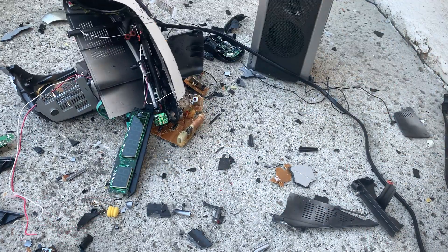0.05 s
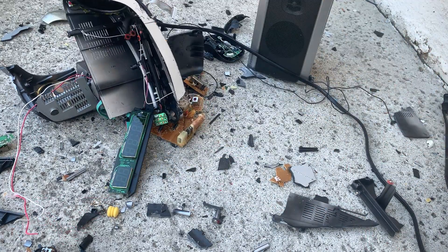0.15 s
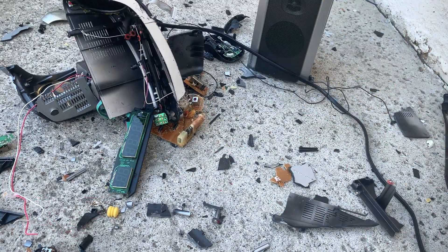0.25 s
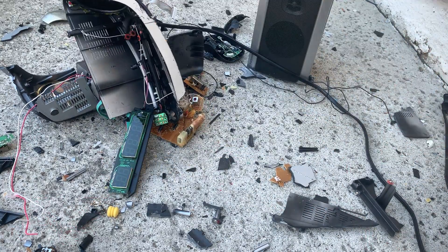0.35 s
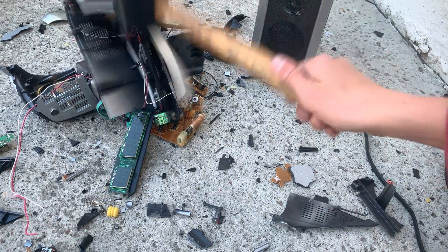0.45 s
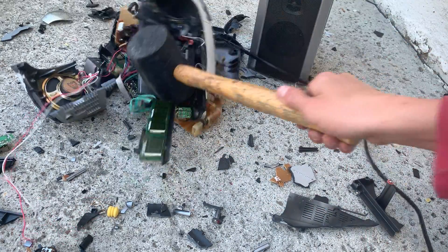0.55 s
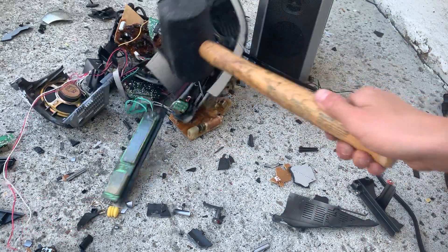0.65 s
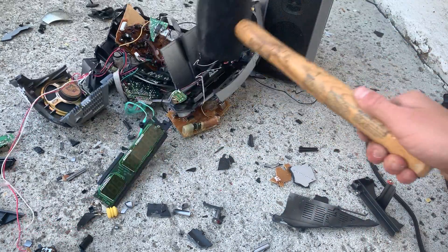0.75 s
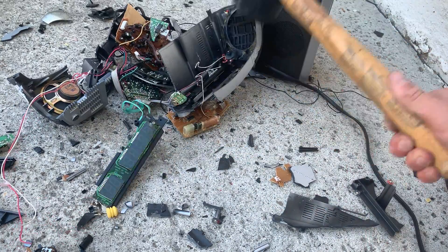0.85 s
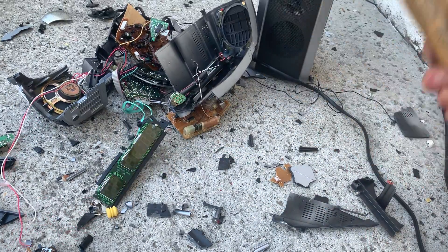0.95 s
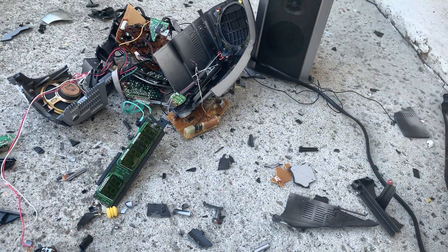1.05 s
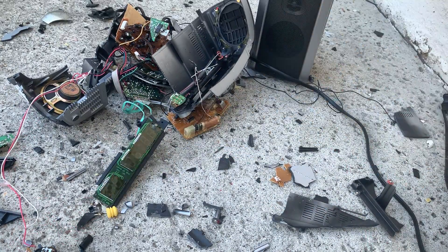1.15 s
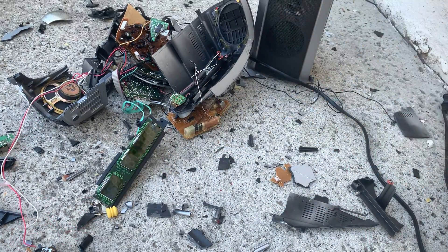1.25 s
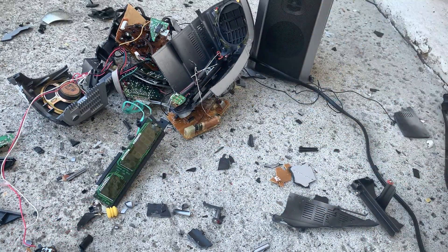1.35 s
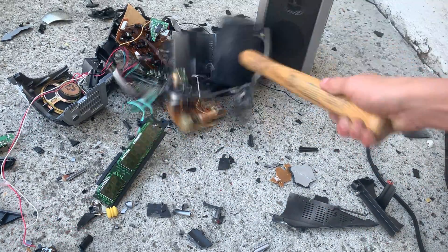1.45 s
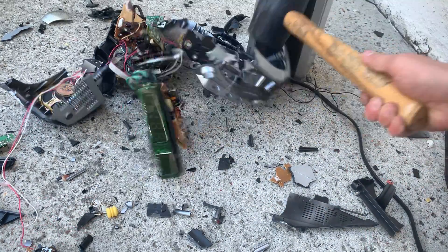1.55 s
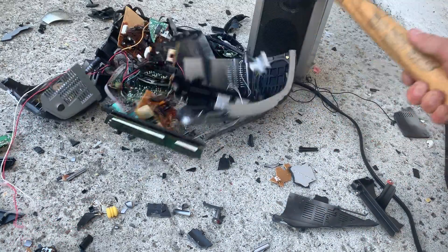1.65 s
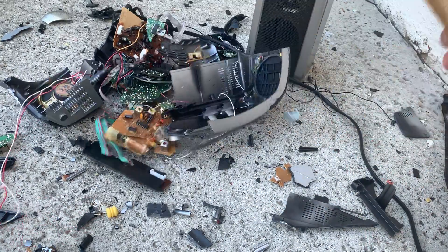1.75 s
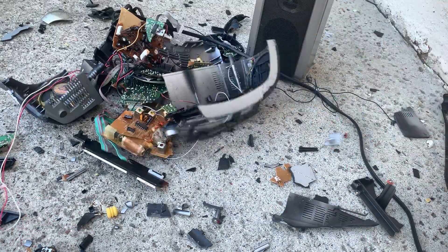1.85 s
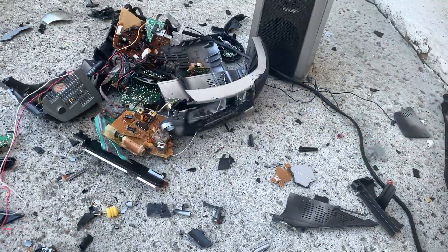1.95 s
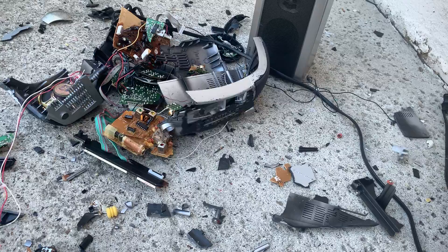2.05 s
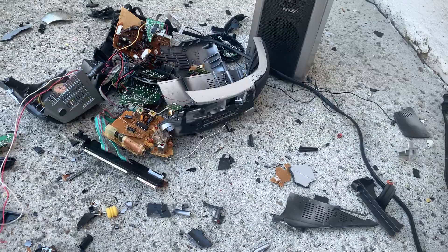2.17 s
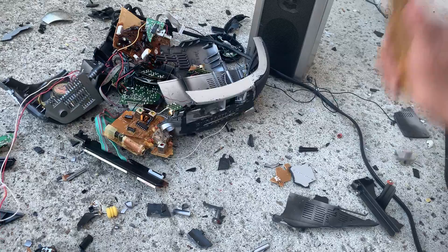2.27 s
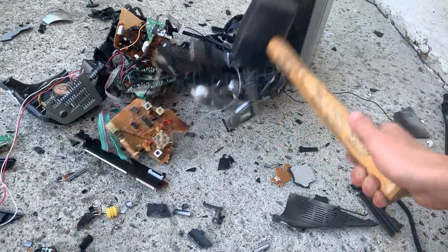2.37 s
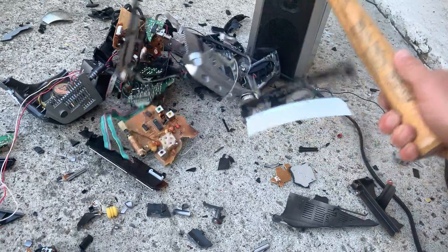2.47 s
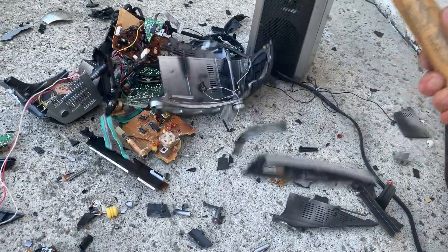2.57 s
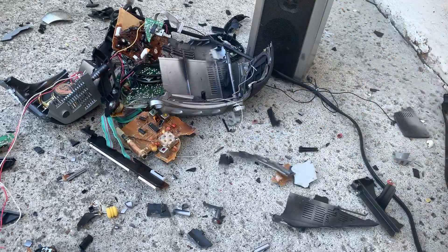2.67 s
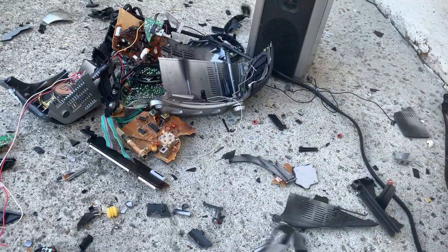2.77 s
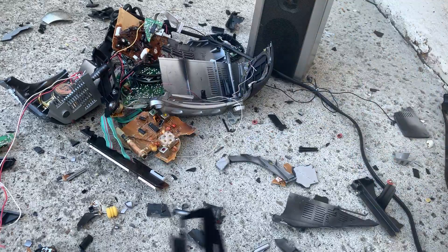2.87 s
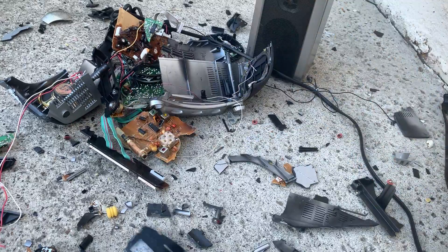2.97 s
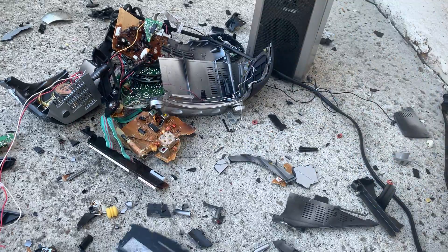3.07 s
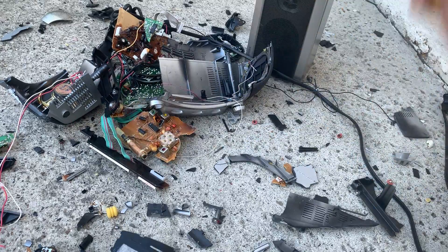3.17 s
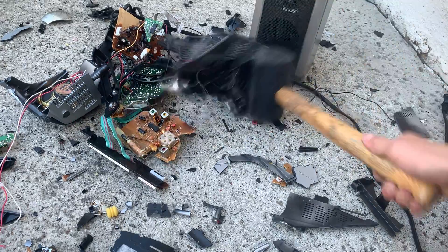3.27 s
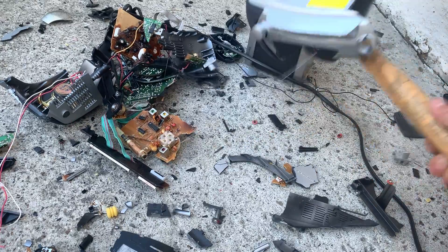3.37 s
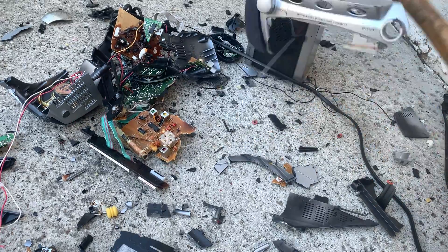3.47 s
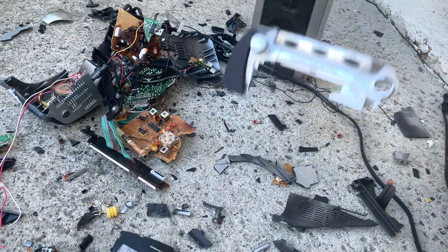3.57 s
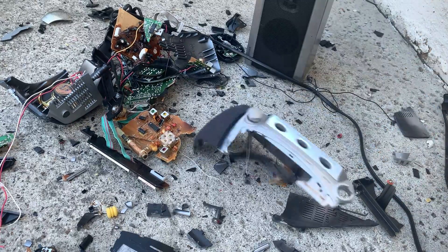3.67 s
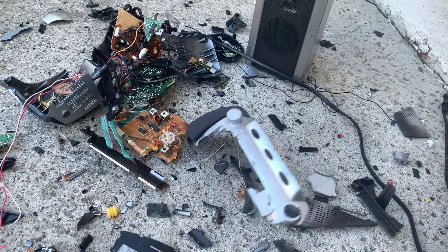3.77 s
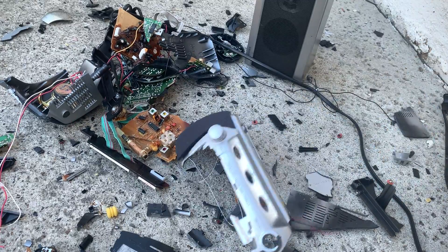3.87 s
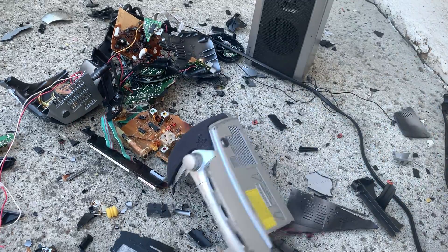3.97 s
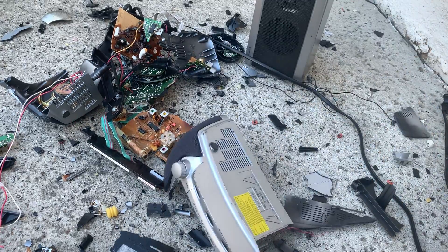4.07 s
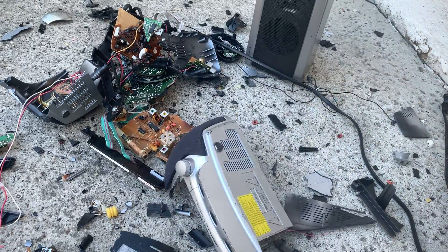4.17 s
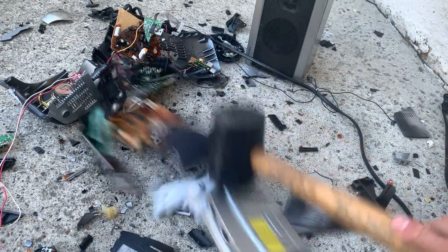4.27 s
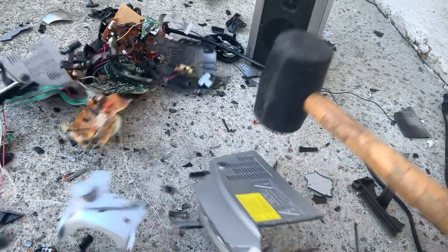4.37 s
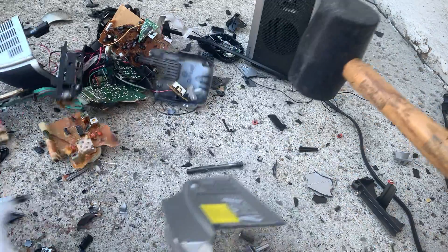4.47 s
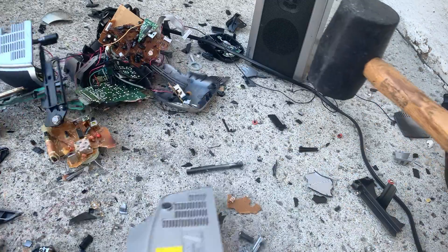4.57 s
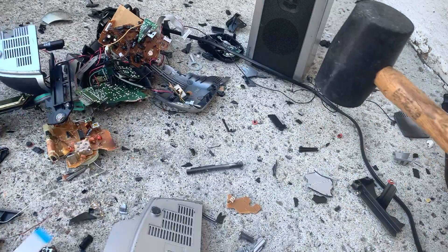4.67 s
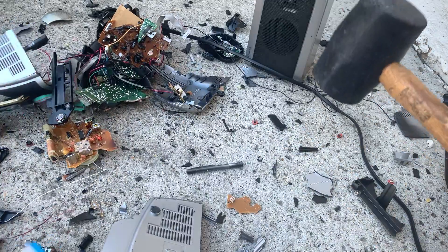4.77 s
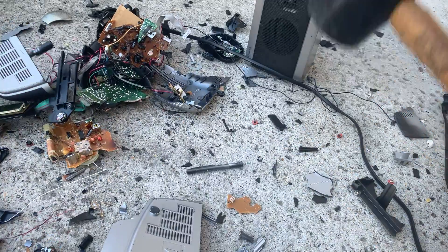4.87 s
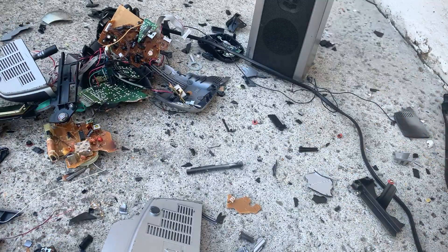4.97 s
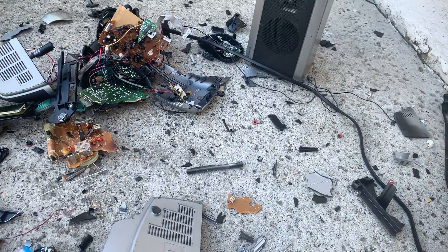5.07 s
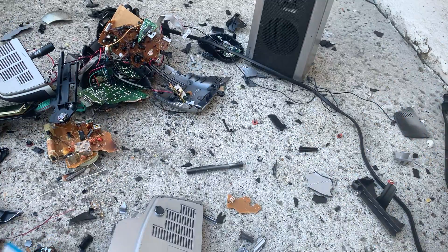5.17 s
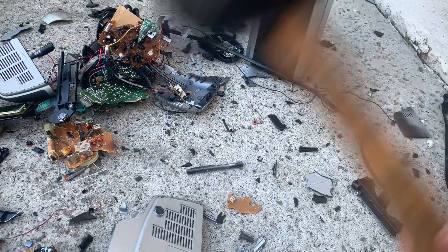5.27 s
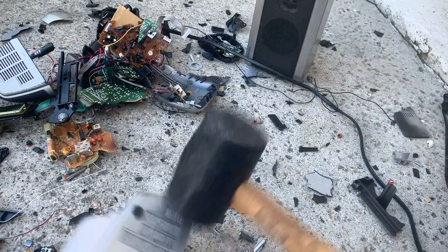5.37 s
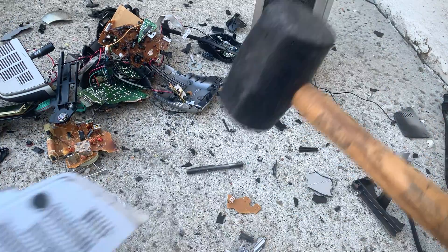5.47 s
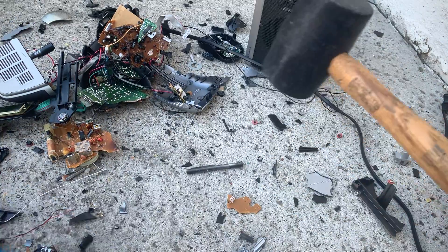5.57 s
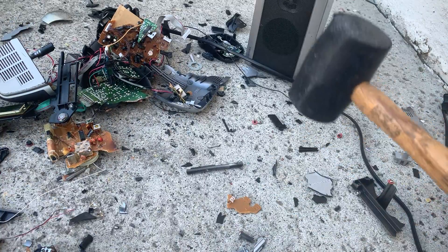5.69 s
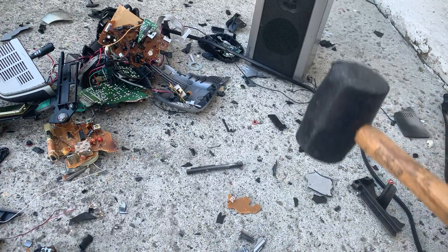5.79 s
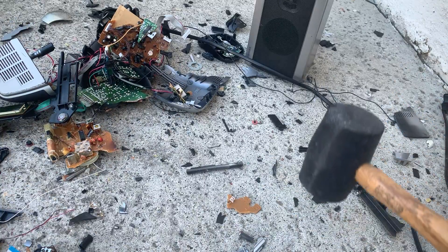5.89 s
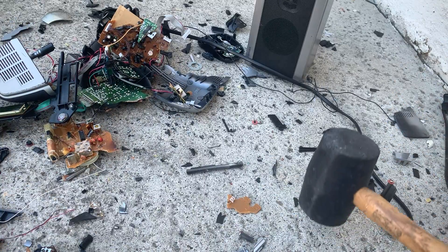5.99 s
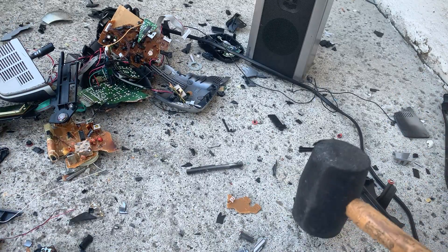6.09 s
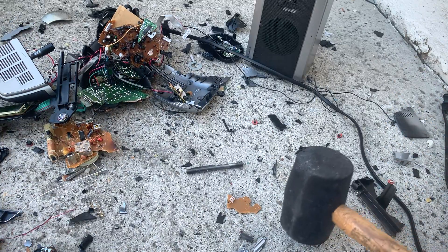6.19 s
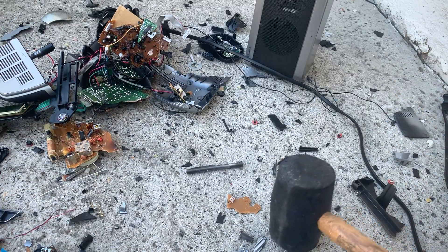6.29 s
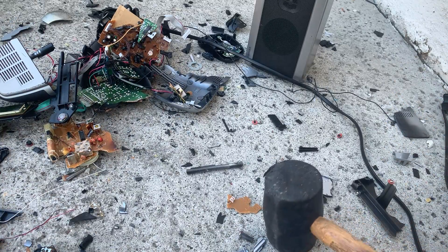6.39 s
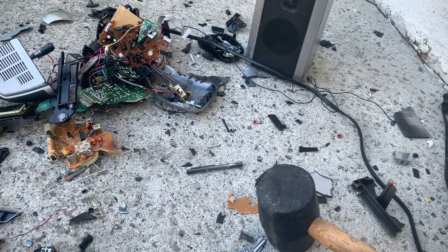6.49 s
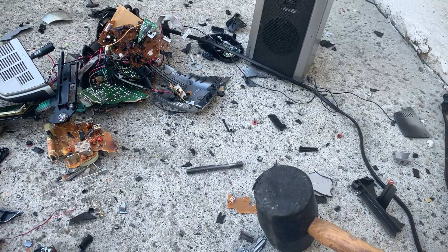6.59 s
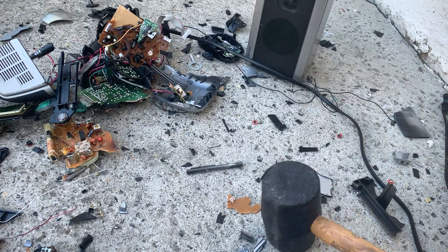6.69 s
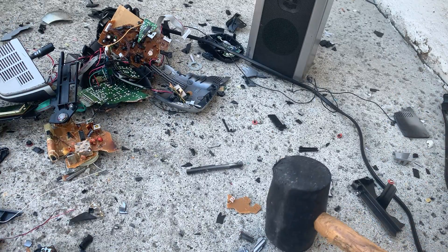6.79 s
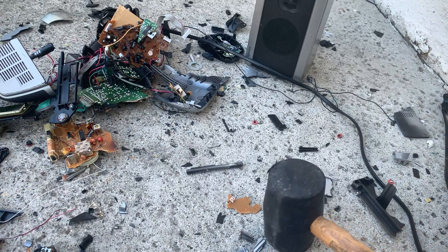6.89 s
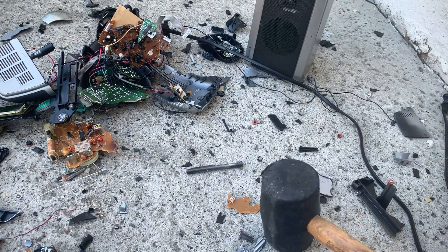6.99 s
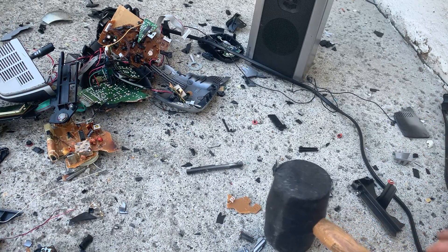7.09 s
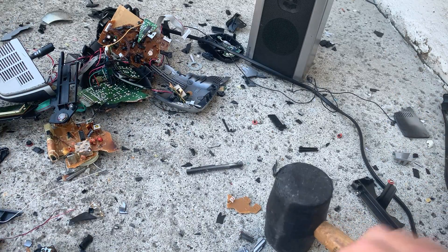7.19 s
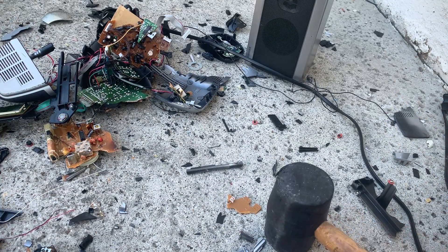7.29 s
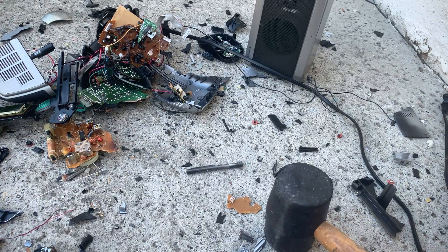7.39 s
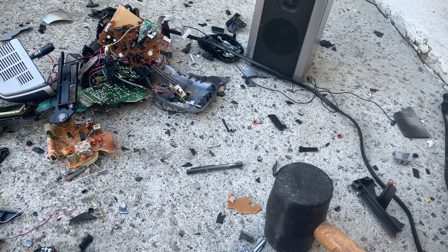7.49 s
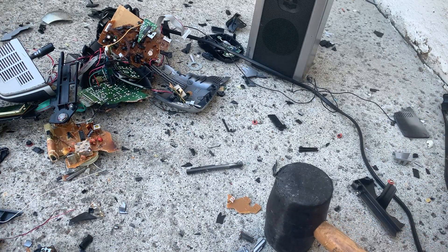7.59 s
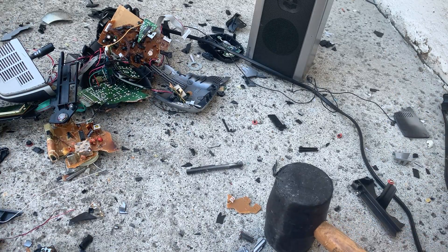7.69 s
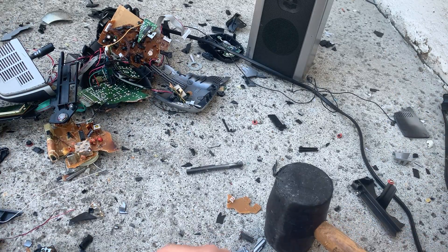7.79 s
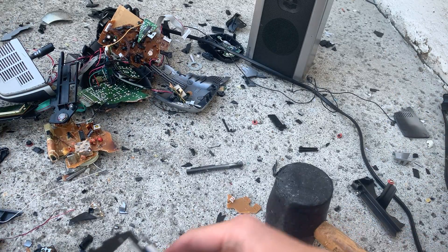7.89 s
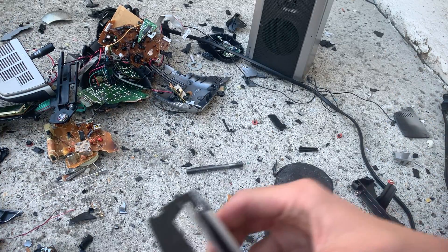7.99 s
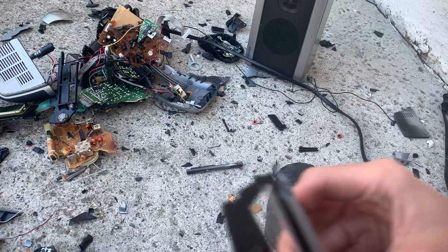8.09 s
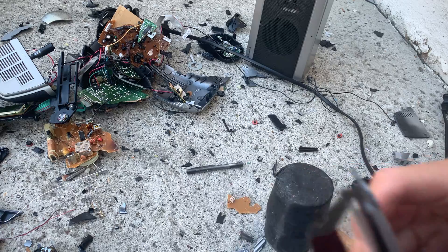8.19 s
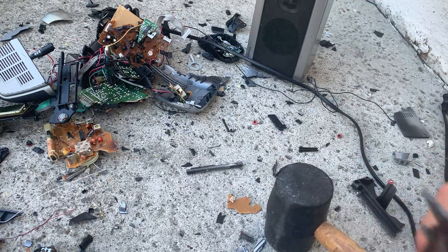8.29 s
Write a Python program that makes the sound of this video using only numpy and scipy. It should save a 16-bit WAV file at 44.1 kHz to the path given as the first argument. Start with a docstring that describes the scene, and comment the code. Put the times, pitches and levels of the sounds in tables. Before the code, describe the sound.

Close in a concrete yard, a rubber mallet smashes a hollow plastic device six times, roughly one second apart. Each hit is a loud, bright, brittle crack with a hollow knock and short thud. Chips spray, pieces clack and skid across the ground, and a cover scrapes. After the last debris settles it is nearly quiet, then a small plastic piece rattles softly in the hand.

```python
"""On a concrete yard between walls, a rubber mallet smashes a hollow plastic device with six close blows.
Each blow is a burst of snaps exciting random plastic modes, plus a struck panel, a knock and a thud.
Chips skitter, pieces land as chattering contacts and ring, edges squeal and a cover drags and rings.
At the end a loose piece rattles in the hand, as impulses and grit through fixed resonances.
Decaying noise gives the walls' answer; shaped noise and a gliding tone give rumble, hiss and far engine."""
import sys
import numpy as np
from scipy import signal
from scipy.fft import rfft, irfft, next_fast_len
from scipy.io import wavfile
from scipy.ndimage import uniform_filter1d, map_coordinates

SR = 44100
rng = np.random.default_rng(int(sys.argv[2]) if len(sys.argv) > 2 else 0)


def output_pcm(signal):
    """Save a mono or channel-first signal as 16-bit PCM at the path in sys.argv[1].

    Samples are clipped to [-1, 1] before scaling.
    """
    pcm = np.clip(np.atleast_2d(signal).T, -1, 1) * 32767
    wavfile.write(sys.argv[1], SR, np.round(pcm).astype(np.int16))


N = 367794  # length in samples
T = np.arange(SR // 4) / SR  # time axis of one short event, s

# All levels are relative: the functions add fixed trims and record() sets the final gain.
# Outdoor background spectrum: pitch_hz, level_db
AIR_SPECTRUM = [(18, -50.5), (32, -29.5), (45, -13.5), (70, -1.5), (105, -7.5), (170, -13.5), (300, -21.5),
                (600, -30), (1000, -31.5), (2400, -47.5), (6500, -45), (8500, -57.5), (14600, -68)]
# Outdoor rumble over time: time_s, level_db
RUMBLE_LEVEL = [(0, -54), (.4, -51.5), (1.2, -61.5), (1.7, -53.5), (2.2, -59.5), (6.4, -61), (8.34, -58)]
# Faint airy hiss over time: time_s, level_db
HISS_LEVEL = [(0, -68), (.45, -78), (1.1, -74), (1.5, -78), (6.4, -85)]
# Far engine over time: time_s, pitch_hz, level_db
ENGINE = [(0, 110, -52.5), (.5, 104.4, -59), (1.2, 88.4, -74), (6.3, 64.1, -73), (6.85, 86.04, -50.5),
          (7.3, 96, -51), (7.7, 99.9, -56.5), (8.34, 104, -70.5)]
# Soft swells of the yard's low resonance: start_s, level_db
YARD_SWELLS = [(2.798, -47.5), (5.58, -51), (5.804, -39.5), (7.198, -44.5)]
# Mallet blows: start_s, crack_db, crush_s, release_t60_s, panel_hz, panel_db, knock_db, thud_db, yard_boom_db
BLOWS = [(0.5278, -9, 0.02, 0.12, 5890, -14.5, -18.5, -20, -48),
         (1.518, -10.5, 0.0032, 0.093, 2130, -17, -20, -24.5, -40),
         (2.393, -8.5, 0.013, 0.063, 3840, -19.5, -23, -25, -40.5),
         (3.326, -9, 0.012, 0.081, 3150, -18.5, -15.5, -16.5, -34.5),
         (4.333, -8.5, 0.01, 0.09, 1516, -17.5, -14.5, -25.5, -38),
         (5.3901, -8.5, 0.008, 0.006, 1500, -11.5, -15, -25, -41.5)]
# Spectrum of the cracking shell: pitch_hz, level_db
CRACK_SPECTRUM = [(150, -8.5), (600, -16), (1500, -9), (2600, -4), (3500, 0.5), (4700, -1), (6200, 4.5),
                  (7400, -4), (8300, 1.5), (9700, -6.5), (11000, -15), (13000, -21.5), (14500, -49)]
# Resonances of the hollow shell: pitch_hz, width_hz, level_db
HOUSING_MODES = [(436, 160, -5.5), (693, 100, 2), (873.4, 63, 5), (1422, 52, 9), (2075, 310, -2)]
# Debris thrown up by each blow: start_s, level_db, falling_s, settling_db_per_s
SHOWERS = [(0.527, -39, 0.19, 143.5), (1.516, -46.5, 0.3, 97), (2.393, -50, 0.39, 42),
           (3.325, -59.5, 0.75, 45), (4.33, -43.5, 0.27, 30.5), (5.389, -53, 0.33, 61)]
# Spectrum of a broken piece: pitch_hz, level_db
PIECE_SPECTRUM = [(100, -2.5), (400, -5), (1500, -5), (3000, 2), (4600, -1.5), (6500, 5), (7600, 1),
                  (9500, -1.5), (11000, -19.5), (13000, -27), (14500, -46.5)]
# Decay of the scatter among wreck, floor and wall: pitch_hz, t60_s
NEAR_DECAY = [(100, 0.35), (1000, 0.17), (6000, 0.19), (13000, 0.03)]
# Decay of the yard's answer: pitch_hz, t60_s
YARD_DECAY = [(100, 1), (500, 0.69), (2000, 0.87), (6000, 0.38), (9000, 0.72), (13000, 0.55)]
# Loudest pieces landing: start_s, clack_db, body_db, edge_db (last two relative to the clack)
LANDINGS = [(0.6728, -34, -10, -12), (0.7167, -41.5, -22, 16), (0.7552, -31, -4.5, -11),
            (1.735, -29.5, -3, -9), (1.7489, -34, 0.5, -3.5), (1.7724, -38.5, -5, 15),
            (1.8219, -39, -8, 7.5), (1.858, -38, -14, 4), (1.9726, -35, -17, -10.5), (1.9853, -33, -5, -6),
            (2.1012, -49.5, -10.5, -5), (2.4272, -28.5, -21, 4.5), (2.6, -36.5, -17, 9.5),
            (2.6442, -36, -1, 0.5), (2.6814, -28.5, -9.5, -3), (2.7196, -33, 2.5, 3.5),
            (2.7893, -34, -3.5, -3), (2.8584, -38.5, -36, -19), (2.9044, -38.5, -17.5, -13.5),
            (3.001, -30, -16.5, -4), (3.024, -35, -18.5, -6), (3.092, -32, -27, -4.5),
            (3.1284, -29, -25, -2.5), (3.205, -38.5, -27, -4), (3.222, -33, -32, -9.5),
            (3.2434, -37, -30, -7), (3.4135, -31, -6, -10), (3.4354, -34.5, -2, -4), (3.717, -29, 1.5, -4),
            (3.7387, -20.5, 3.5, 2.5), (3.8443, -46.5, 9.5, 2), (4.0248, -48, 16, 6), (4.0743, -49.5, 2, 4),
            (4.274, -51.5, -15, 6), (4.3614, -20, -16.5, -6.5), (4.4494, -45.5, -18, 3),
            (4.563, -35, -4, 0.5), (4.6172, -20.5, -14, -8), (4.6306, -23.5, -19, -6.5),
            (4.8342, -38.5, 4, -7), (4.8575, -40.5, -4.5, 4), (5.028, -49.5, 3.5, -4.5),
            (5.2305, -48.5, -13.5, 1), (5.5054, -55, -27.5, -13), (5.678, -29, -20, -6.5),
            (5.7088, -37, -34, -6), (5.7648, -24.5, -11.5, -3.5), (5.7867, -28.5, -4, -13),
            (5.7987, -23.5, -37, -1), (5.846, -36.5, 0, -0.5), (5.9405, -45, 0, -35),
            (5.9716, -34, -4.5, 0), (6.0455, -46.5, -23, -7.5)]
# Stiff parts that ring on: start_s, pitch_hz, level_db, t60_s
PART_RINGS = [(1.599, 246, -39.5, 0.085), (1.858, 6560, -31.5, 0.021), (2.048, 6620, -46.5, 0.026),
              (2.858, 2165, -37, 0.033), (3.094, 1630, -48, .15), (3.205, 1670, -42.5, 0.092),
              (3.739, 4206, -32.5, 0.11), (3.742, 182.7, -34.5, 0.081), (3.897, 4160, -51.5, 0.18),
              (5.011, 6590, -41.5, 0.046), (5.443, 550, -51, 0.06), (5.547, 486, -46, 0.039),
              (5.622, 584, -47, 0.077), (5.708, 3110, -34, 0.044), (5.791, 159, -41.5, 0.062),
              (6.388, 201, -53.5, 0.086)]
# Sliding pieces, one list each: time_s, pitch_hz, level_db
SLIDES = [
    [(2.95, 1720, -53), (3.05, 1662, -42.5), (3.18, 1680, -72.5), (3.23, 1674, -86), (3.32, 1640, -29.5)],
    [(5.01, 1921, -59), (5.055, 2013, -46.5), (5.1, 1831, -47), (5.18, 1718, -54.5), (5.3, 1657, -67)],
    [(5.5, 3296, -49), (5.6, 3330, -46), (5.7, 3180, -42), (5.74, 2213, -47), (5.79, 2086, -39)],
]
# Partials of a sliding piece: pitch_ratio, level_db
SQUEAL_PARTIALS = [(1, 0.5), (1.302, -11), (1.7, -12.5)]
# Hollow cover dragging on the concrete: start_s, end_s, level_db
COVER_DRAGS = [(3.722, 3.87, -38.5), (4.033, 4.102, -41.5), (4.575, 4.743, -34.5), (4.747, 4.856, -56),
               (5.785, 5.884, -35.5)]
# Hits that set the cover ringing: start_s, level_db
COVER_KNOCKS = [(4.36, -38), (4.618, -41), (5.4, -70), (5.8, -40), (5.939, -48.5)]
# Modes of the loose cover: pitch_hz, level_db, t60_s
COVER_MODES = [(674, 0.5, 0.77), (1370, -0.5, 0.35)]
# Loose piece rattling in the hand: start_s, clack_db
RATTLES = [(7.4928, -44.5), (7.5144, -35), (7.5979, -37.5), (7.639, -39), (7.6609, -37), (7.7382, -41.5),
           (7.7606, -31.5), (7.8541, -37), (7.9298, -44.5), (8.019, -45.5), (8.1258, -52), (8.2206, -47)]
# Resonances of that piece: pitch_hz, width_hz, level_db
HELD_MODES = [(1588, 137, 5), (2220, 255, -1), (2840, 55, 2), (3220, 460, 4), (3870, 320, -2.5),
              (4537, 640, -3.5), (6640, 500, -3.5), (8330, 1280, -7.5)]
# Scraping between the touches: time_s, level_db
RUSTLE_LEVEL = [(7.2, -86), (7.472, -82), (7.678, -56), (7.742, -61.5), (8.34, -75)]
# Gain of the stereo difference, small where close ports hear long waves alike: pitch_hz, side_db
SIDE_GAIN = [(60, -5), (300, -2), (1000, 4), (5000, 0)]
# Level difference of the two ports: pitch_hz, left_minus_right_db
PORT_DIFFERENCE = [(60, -2), (200, 0), (700, -1.5), (1300, 0), (2300, -1.5), (4800, -6), (7000, -2.5),
                   (7700, -3), (8200, 17), (10000, 21), (14000, 20.5)]

SPRAY_DB, SPRAY_S = 5, 0.066  # the shower starts stronger: extra level, time constant
SMALL_PER_S, SMALL_DB, SMALL_SCATTER_DB = 21, 1, 6.5  # lesser pieces: rate, level over the shower, spread
SMALL_BODY_DB, SMALL_EDGE_DB = -8, -3  # their mean body and edge, relative to the clack
RATTLE_BODY_DB, RATTLE_EDGE_DB = -10.5, -11  # relative to the clack
SCRAPE_DB, SCRAPE_T60_S = -15.5, 0.24  # each touch starts a dying scrape: level over the clack, decay
LEAD_S = .00003  # sound reaches the left port first
TOP_HZ = 14800  # nothing passes above


def amp(db):
    """Logarithmic level: decibels to amplitude gain."""
    return 10 ** (np.asarray(db) / 20)


def unit(x):
    """Normalisation to rms 1."""
    return x / np.sqrt(np.mean(x ** 2) + 1e-20)


def crest(x, size=256):
    """Normalisation by short-time power: the loudest few milliseconds get rms 1."""
    power = uniform_filter1d(np.mean(x ** 2, 0), size)
    return x / np.sqrt(power.max() + 1e-20)


def along(points, hz):
    """Interpolation of (Hz, value) points on a logarithmic frequency axis."""
    f, v = np.transpose(points)
    return np.interp(np.log(hz + 1), np.log(f), v)


def curves(rows):
    """Linear interpolation in time: one value per sample for each column after the time."""
    s, *cols = np.transpose(rows)
    return [np.interp(np.arange(N) / SR, s, c) for c in cols]


def wobble(rate):
    """Band-limited fluctuation: a smooth random curve with rate knots a second."""
    knots = rng.standard_normal(int(N * rate / SR) + 4)
    return map_coordinates(knots, [np.arange(N) * rate / SR])


def add(track, s, x):
    """Superposition: mix x into the track at time s."""
    i = max(round(s * SR), 0)
    track[:, i:i + x.shape[-1]] += x[..., :max(N - i, 0)]


def filtered(x, response):
    """Linear filtering: the spectrum of x times a frequency response."""
    n = x.shape[-1]
    m = 2 * next_fast_len(n // 2 + SR // 20)
    return irfft(rfft(x, m) * response(np.fft.rfftfreq(m, 1 / SR)), m)[..., :n]


def colour(x, points):
    """Minimum-phase filtering with the gain of (Hz, dB) points."""
    def response(hz):
        cepstrum = irfft(np.log(amp(along(points, hz))))
        half = len(cepstrum) // 2
        # folding the cepstrum onto positive times makes the filter causal
        return np.exp(rfft(np.r_[cepstrum[0], 2 * cepstrum[1:half], np.zeros(half)]))
    return filtered(x, response)


def resonate(x, modes):
    """Modal resonance: x through parallel (Hz, width Hz, dB) modes of alternating sign."""
    def response(f):
        total = 0
        for k, (centre, width, db) in enumerate(modes):
            damping = 1j * f * width
            total = total + (-1) ** k * amp(db) * damping / (centre ** 2 - f ** 2 + damping)
        return total
    return filtered(x, response)


def band(x, lo_hz, hi_hz):
    """Causal Butterworth band-pass."""
    edges = [lo_hz, min(hi_hz, .49 * SR)]
    return signal.sosfilt(signal.butter(3, edges, 'band', fs=SR, output='sos'), x)


def spread(x, apart):
    """Interchannel coherence: two signals become left and right, sharing more the smaller apart is."""
    return np.array([x[0] + apart * x[1], x[0] - apart * x[1]])


def noise(n, apart):
    """Stereo white noise of partial coherence."""
    return spread(rng.standard_normal((2, n)), apart)


def snaps(n, rate, scatter_db):
    """Random point process: impulses of uneven size and either sign, rate a second on average."""
    hits = rng.random(n) < rate / SR
    return hits * amp(scatter_db * rng.standard_normal(n)) * rng.choice([-1, 1], n)


def boom(db, hz=59.0):
    """Low resonance between the walls: a tone that builds up and dies away."""
    t = np.arange(SR // 2) / SR
    rise_s = .038  # the peak comes after two of these
    swell = (t / rise_s) ** 2 * np.exp(-t / rise_s)
    return amp(db) * swell / swell.max() * np.sin(2 * np.pi * hz * t)


def outdoors():
    """Broadband and tonal background: rumble, hiss, a far engine and the yard's low resonance."""
    air = unit(colour(noise(N, 0.38), AIR_SPECTRUM))
    out = amp(curves(RUMBLE_LEVEL)[0] + 2.5 + 1.6 * wobble(18.0)) * air
    hiss = unit(band(noise(N, 0.72), lo_hz=1490, hi_hz=7100))
    out += amp(curves(HISS_LEVEL)[0]) * hiss
    hz, db = curves(ENGINE)
    engine_phase = 2 * np.pi * np.cumsum(hz * (1 + .015 * wobble(4.2))) / SR
    out += amp(db + 1.6 * wobble(7.2)) * np.sin(engine_phase)
    for s, *_, boom_db in BLOWS:
        add(out, s + .01, boom(boom_db))
    for s, db in YARD_SWELLS:
        add(out, s, boom(db))
    return out


def shard(t60, tick, count=44):
    """Modal superposition: a plastic fragment's contact tick and randomly placed decaying modes, in stereo."""
    t = T[:SR // 12]
    hz = rng.uniform(np.sqrt(600), np.sqrt(11000), (count, 1)) ** 2
    # t60 holds near 3 kHz; higher modes die sooner
    life = t60 * (hz / 3000) ** -.4 * np.exp(.25 * rng.standard_normal((count, 1)))
    phase = rng.normal(0, 1.0, (2, count, 1))  # each mode radiates differently toward each port
    strength = rng.standard_normal((count, 1))
    ring = np.sum(strength * amp(-60 * t / life) * np.sin(2 * np.pi * hz * t + phase), 1)
    click = noise(len(t), .85) * amp(-60 * t / .012)
    return crest(ring) + tick * crest(click)


def mallet():
    """Brittle fracture under impact: the shell snaps as the head sinks in, panel and housing ring, rubber thuds."""
    out = np.zeros((2, N))
    n = len(T)
    for s, crack_db, crush_s, release_s, panel_hz, panel_db, knock_db, thud_db, _ in BLOWS:
        force = (1 - np.exp(-T / 0.001)) * amp(-60 * np.maximum(T - crush_s, 0) / release_s)
        splinters = amp(-22.5 - 60 * T / 0.1)  # single late snaps as the cracks run on
        cracks = np.zeros((2, n))
        for _ in range(6):
            breaks = force * snaps(n, 700, scatter_db=5.0) + splinters * snaps(n, 47, scatter_db=4.5)
            cracks += signal.fftconvolve(breaks[None], shard(t60=0.045, tick=2.0), axes=1)[:, :n]
        push = force * noise(n, .55)
        panel = resonate(cracks, [(panel_hz, 0.081 * panel_hz, 0)])
        knock = resonate(push, HOUSING_MODES)
        thud = band(push, lo_hz=100, hi_hz=440)
        parts = [(crack_db, colour(cracks, CRACK_SPECTRUM)), (panel_db, panel),
                 (knock_db, knock), (thud_db, thud)]
        add(out, s, sum(amp(level) * crest(part) for level, part in parts))
    return out


def shower_db(s):
    """Piecewise decay of the debris level at times s: a first spray, a hold, then a steady settling."""
    levels = []
    for start, db, falling_s, settle_db_per_s in SHOWERS:
        age = np.maximum(s - start, 0)
        level = db + SPRAY_DB * np.exp(-age / SPRAY_S) - settle_db_per_s * np.maximum(age - falling_s, 0)
        levels.append(np.where(s >= start, level, -np.inf))
    return np.max(levels, 0)


def chips(count=6):
    """Granular impact sound: small chips of several shapes skitter over the ground in fits and starts."""
    fits = amp(5.5 * wobble(25))
    shower = np.zeros((2, N))
    for _ in range(count):
        hops = fits * snaps(N, 80, scatter_db=4)
        shower += signal.oaconvolve(hops[None], shard(t60=.07, tick=2.2), axes=1)[:, :N]
    shower = unit(band(colour(shower, PIECE_SPECTRUM), lo_hz=860, hi_hz=15000))
    return amp(shower_db(np.arange(N) / SR) + 0.5) * shower


def echo(x, decay, delay_s):
    """Diffuse reverberation: a delayed noise tail in which each frequency dies at its own speed."""
    hz, t, z = signal.stft(rng.standard_normal((2, SR)), SR, nperseg=256)
    fading = amp(-60 * t / along(decay, hz)[:, None])
    tail = signal.istft(z * fading, SR, nperseg=256)[1]
    tail = np.pad(spread(tail, .9), ((0, 0), (round(delay_s * SR), 0)))
    return signal.oaconvolve(x, tail / np.linalg.norm(tail[0]), axes=1)[:, :N]


def contact(ring, db, body_db, edge_db, chatter_s):
    """Repeated contact: several corners touch in turn; body, clack and edge are balanced by band."""
    fading = amp(-60 * T / chatter_s)
    touches = fading * snaps(len(T), 1500, scatter_db=-4) * 0.42
    touches[0] = 1
    x = signal.fftconvolve(touches[None], ring, axes=1)[:, :SR // 8]
    clack = band(x, 1200, 5000)
    edge = band(x, 5000, 15000)
    body = band((noise(len(T), 0.97) * fading)[:, :SR // 8], lo_hz=204, hi_hz=1440)
    return amp(db) * (amp(body_db - 2.5) * crest(body) + crest(clack) + amp(edge_db + 2.5) * crest(edge))


def small_landings(count):
    """Irregular arrivals: lesser pieces after each blow follow the shower's level; rows as in LANDINGS."""
    rows = []
    for start, *_ in SHOWERS:
        s = start + SPRAY_S + (np.arange(count) + rng.random(count)) / SMALL_PER_S
        size, body, edge = SMALL_SCATTER_DB * rng.standard_normal((3, count))
        rows += zip(s, shower_db(s) + SMALL_DB + size, SMALL_BODY_DB + body, SMALL_EDGE_DB + edge)
    return rows


def ringing(hz, t60):
    """Beating of close modes: one mode of a stiff part, with neighbours that die sooner."""
    t = np.arange(SR // 2) / SR
    main = np.sin(2 * np.pi * hz * t + rng.normal(0, 0.35, (2, 1)))
    near_hz = hz * (1 + rng.normal(0, 0.03, (4, 1)))
    near = np.sin(2 * np.pi * near_hz * t + rng.normal(0, 1.7, (2, 4, 1))).sum(1)
    envelope = amp(-60 * t / t60) * (1 - np.exp(-t / 0.0013))
    return crest((main + 0.6 * near * amp(-30 * t / t60)) * envelope)


def pieces(count=10):
    """Impact excitation of free bodies: pieces land and chatter on the concrete, stiff parts ring on."""
    out = np.zeros((2, N))

    def fragment():
        """Modal ring of one broken piece, coloured as plastic."""
        return colour(shard(t60=0.02744, tick=1.2), PIECE_SPECTRUM)
    shapes = [fragment() for _ in range(count)]
    falls = [(fragment(), row) for row in LANDINGS]  # loud pieces each have a ring of their own
    falls += [(shapes[rng.integers(count)], row) for row in small_landings(count=11)]
    for ring, (s, db, body_db, edge_db) in falls:
        chatter_s = 0.041 * amp(-.3 * edge_db)  # small, bright pieces settle sooner
        add(out, s, contact(ring, db, body_db, edge_db, chatter_s))
    for s, hz, db, t60 in PART_RINGS:
        add(out, s, amp(db + 4.0) * ringing(hz, t60))
    return out


def slides():
    """Stick-slip friction: an edge slides on the grit with a rough, broken squeal of drifting pitch."""
    out, t = np.zeros((2, N)), np.arange(N) / SR
    for rows in SLIDES:
        hz, db = curves(rows)
        sliding = (t > rows[0][0]) & (t < rows[-1][0])
        rough_hz = hz * (1 + .08 * wobble(1100))
        phase = 2 * np.pi * np.cumsum(rough_hz[sliding]) / SR
        grip = unit(amp(6 * wobble(110)))
        squeal = sum(amp(partial_db) * np.sin(ratio * phase + rng.normal(0, 1.0, (2, 1)))
                     for ratio, partial_db in SQUEAL_PARTIALS)
        out[:, sliding] += (amp(db) * grip)[sliding] * squeal
    return out


def cover():
    """Friction-driven resonance: grit excites the dragged hollow cover ever less; hard knocks leave it ringing."""
    out = np.zeros((2, N))
    for start, end, db in COVER_DRAGS:
        slowing = np.clip(1 - T / max(end - start, .02), 0, 1) ** .5
        stroke = (1 - np.exp(-T / 0.0098)) * slowing
        grit = np.array([snaps(len(T), 1100, scatter_db=11.0) for _ in range(2)])
        add(out, start, amp(db + 1) * crest(resonate(spread(grit, 0.43) * stroke, HOUSING_MODES)))
    for s, db in COVER_KNOCKS:
        add(out, s, sum(amp(db + mode_db) * ringing(hz, t60) for hz, mode_db, t60 in COVER_MODES))
    return out


def handling():
    """Source and resonator: touches and grit excite the held piece's fixed modes; the sleeve rustles."""
    grit = np.array([snaps(N, 900, scatter_db=3.5) for _ in range(2)]) * amp(9.4 * wobble(40))
    scrape = unit(colour(resonate(spread(grit, 0.7), HELD_MODES), PIECE_SPECTRUM))
    sleeve = unit(band(noise(N, 0.86), lo_hz=202, hi_hz=900))
    out, rubbing = np.zeros((2, N)), np.zeros((1, N))
    t = np.arange(SR) / SR
    for s, db in RATTLES:
        tap = noise(len(T), 0.48) * amp(-60 * T / 0.016)
        ring = colour(resonate(tap, HELD_MODES), PIECE_SPECTRUM)
        add(out, s, contact(ring, db - 7, RATTLE_BODY_DB, RATTLE_EDGE_DB, chatter_s=0.093))
        add(rubbing, s, amp(db + SCRAPE_DB - 60 * t / SCRAPE_T60_S))
    started = np.arange(N) / SR > RUSTLE_LEVEL[0][0]
    rubbing += amp(curves(RUSTLE_LEVEL)[0] - 1) * started
    return out + rubbing * (scrape + amp(-17.5) * sleeve)


def scene():
    """Superposition of direct sound, near scatter, the yard's longer answer and the background."""
    blows = mallet()
    clatter = pieces() + cover() + chips() + slides() + handling()
    near = echo(amp(-17.0) * blows + amp(-8.0) * clatter, NEAR_DECAY, delay_s=0.0019)
    far = echo(amp(-32.5) * blows + amp(-22.0) * clatter, YARD_DECAY, delay_s=0.055)
    return blows + clatter + near + far + outdoors()


def record(dry):
    """Two-port reception: level and arrival-time differences, soft saturation, then a low-pass limit."""
    def ports(hz):
        """Gain and phase of the left and right ports."""
        ratio = amp(along(PORT_DIFFERENCE, hz))
        lead = np.exp(1j * np.pi * hz * LEAD_S)  # half the lead on each side
        return np.array([ratio * lead, 1 / lead]) * 2 / (1 + ratio)
    side = filtered((dry[0] - dry[1]) / 2, lambda hz: amp(along(SIDE_GAIN, hz)))
    x = filtered(spread([dry.mean(0), side], 0.935), ports) * amp(-3.5)
    x = x / (1 + np.abs(x / .93) ** 4) ** (1 / 4)  # peaks bend toward 0.93
    return filtered(x, lambda hz: (hz < TOP_HZ) / np.sqrt(1 + (hz / 12800) ** 40))


dry = scene()
out = record(dry)
output_pcm(out)
```